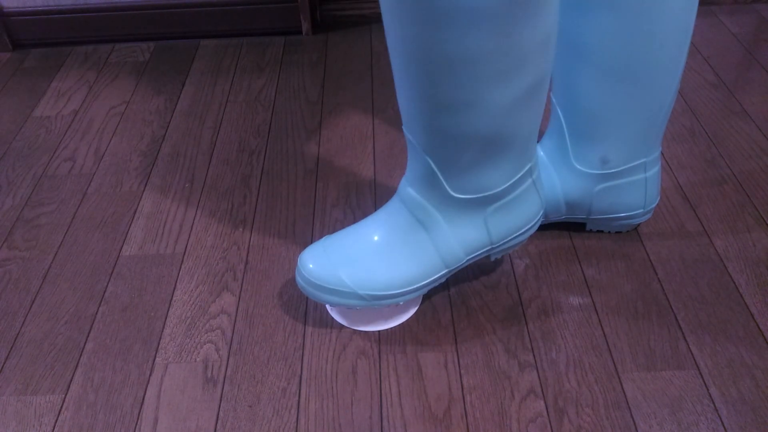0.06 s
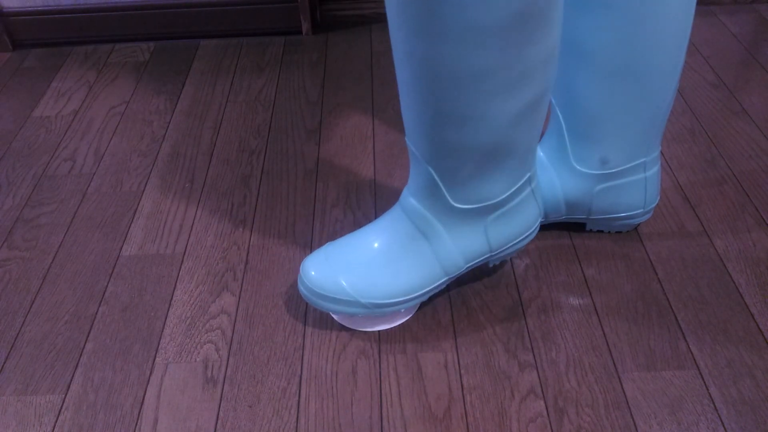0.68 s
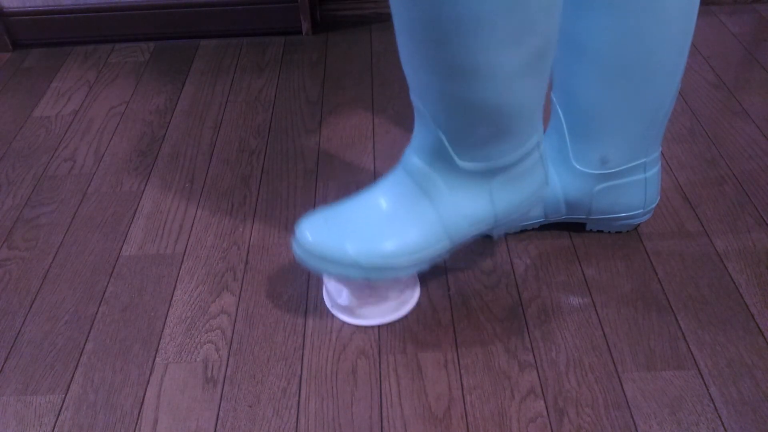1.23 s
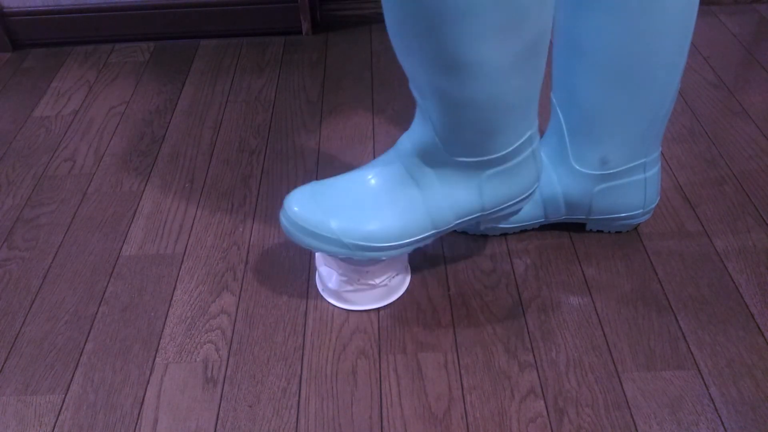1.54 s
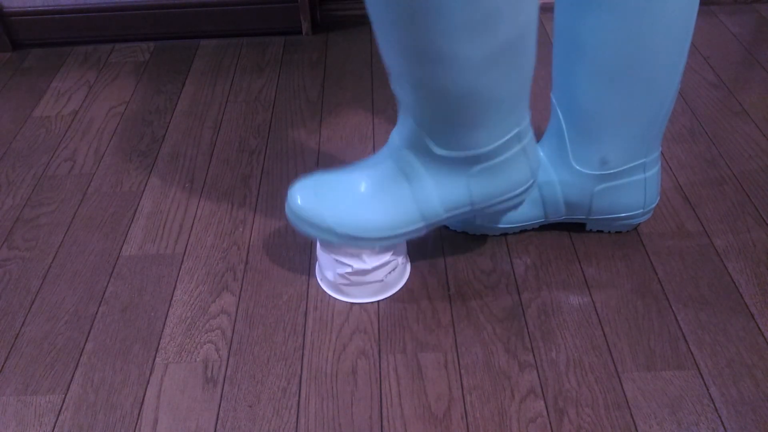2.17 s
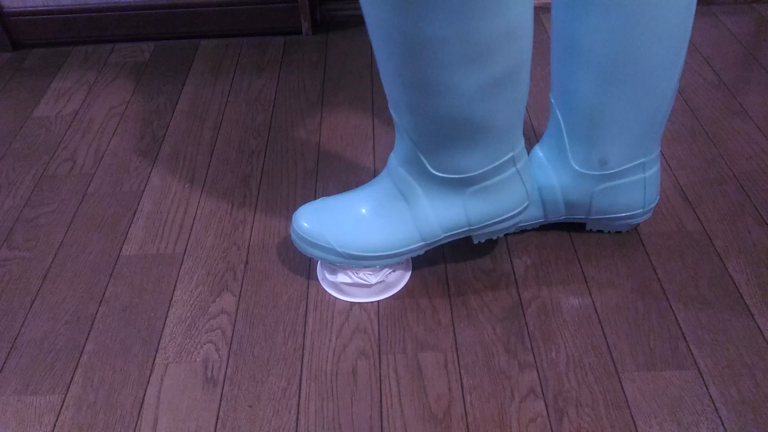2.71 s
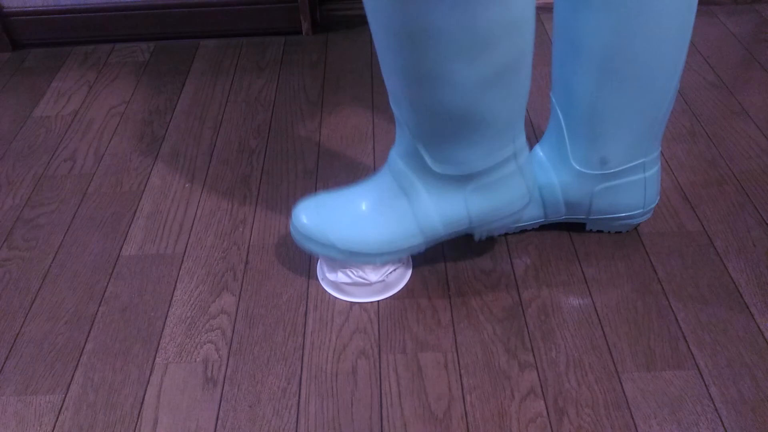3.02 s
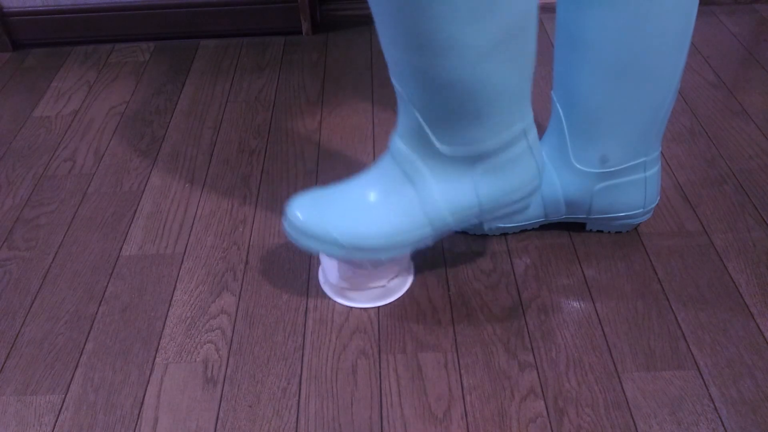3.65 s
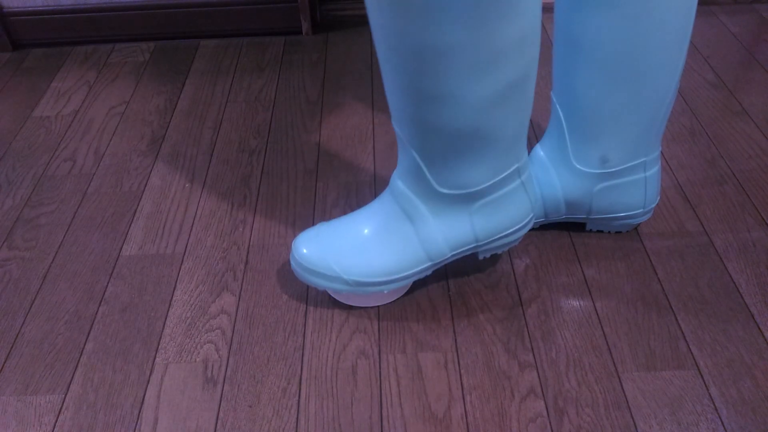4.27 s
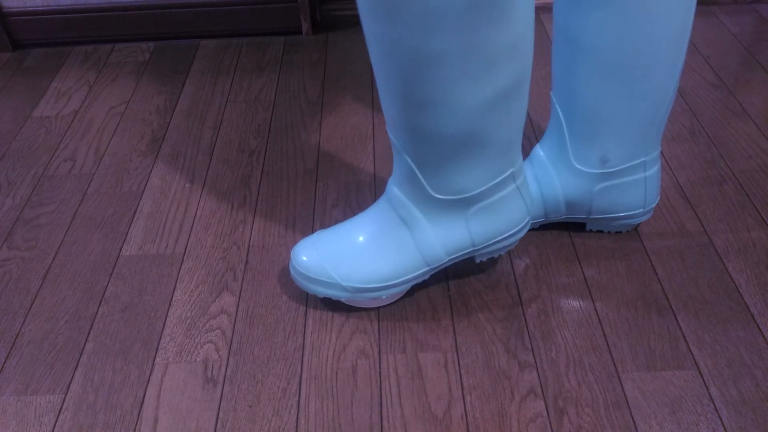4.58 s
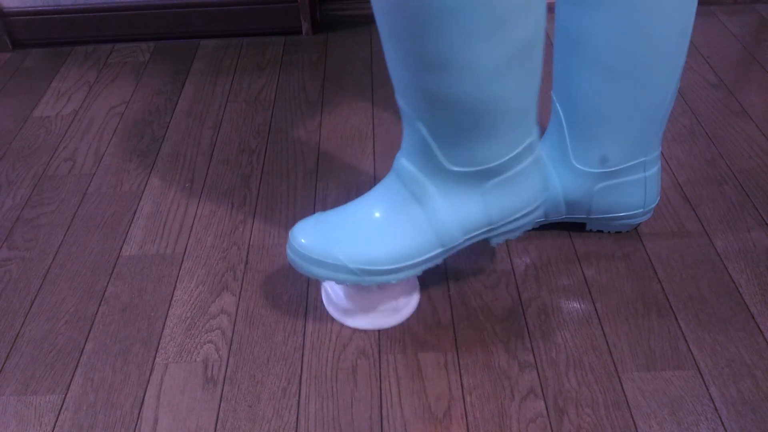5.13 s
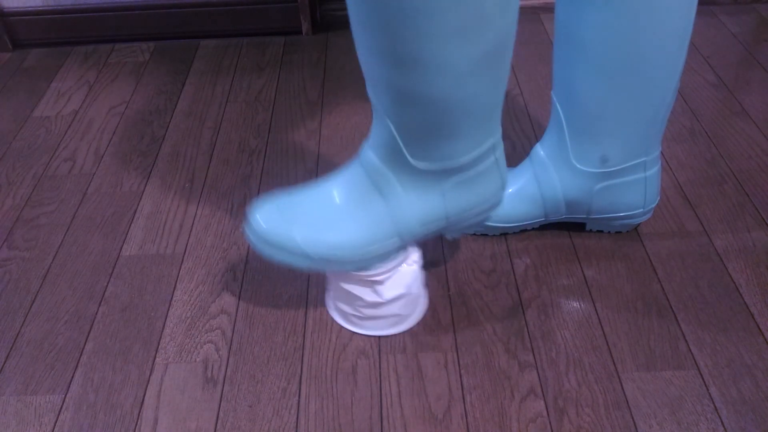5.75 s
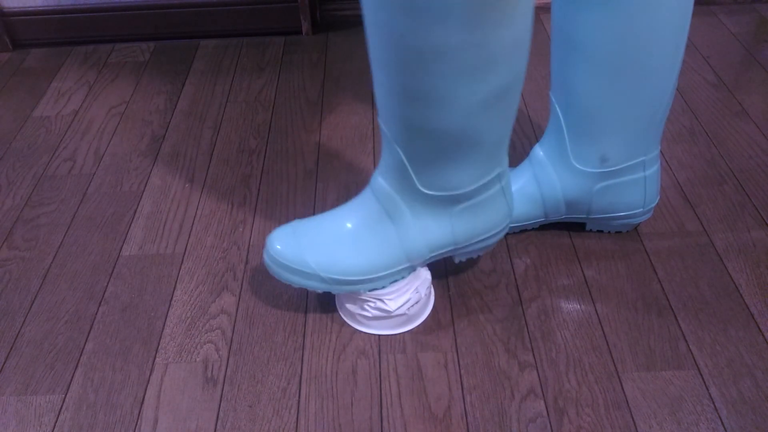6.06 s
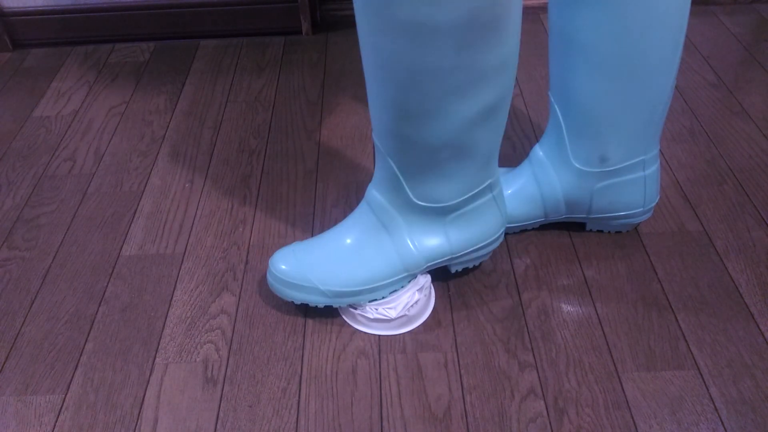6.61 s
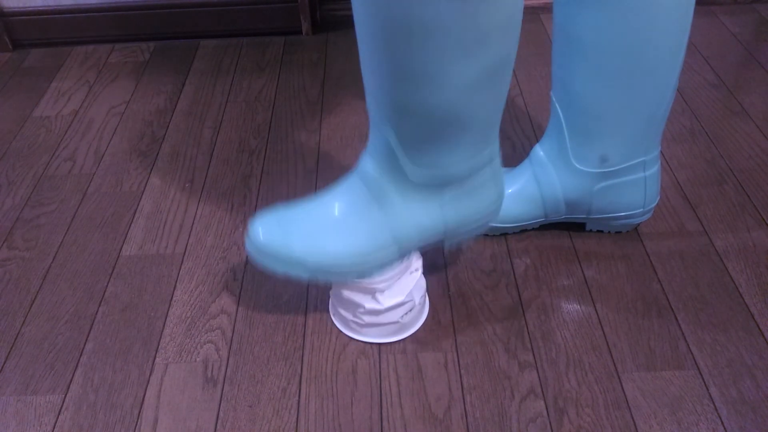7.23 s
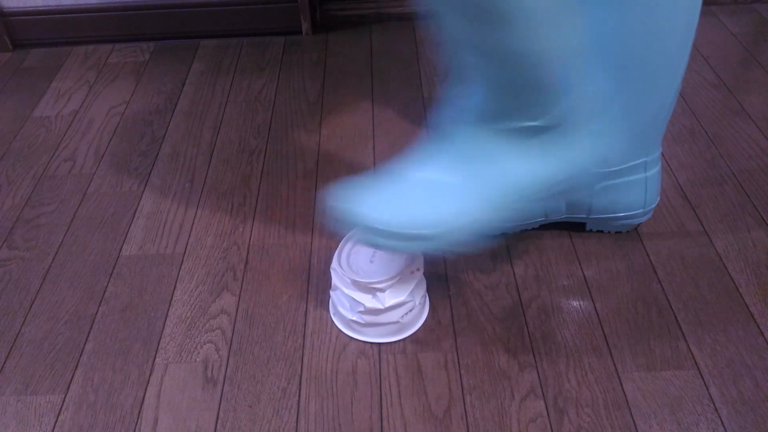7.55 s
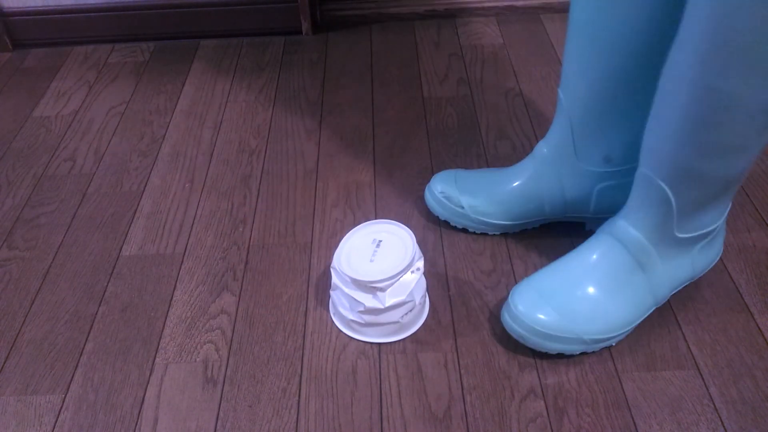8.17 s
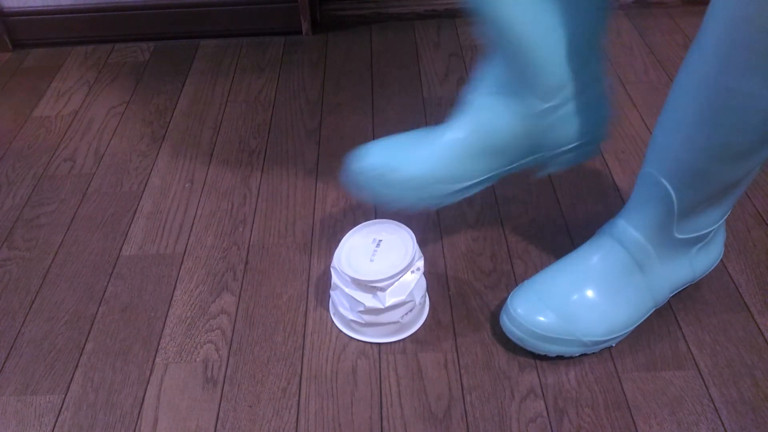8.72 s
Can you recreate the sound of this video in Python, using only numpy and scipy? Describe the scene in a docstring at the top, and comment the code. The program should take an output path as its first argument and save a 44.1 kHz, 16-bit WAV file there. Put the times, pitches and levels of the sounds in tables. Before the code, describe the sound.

A rubber boot presses an upturned plastic cup against a wooden floor and lets it spring back, three times. The thin wall crackles and pops in short clusters with pauses between, the rim knocks on the boards, and the sole rubs faintly. Near the end the boot steps softly away and a tiny lens motor whirs. It sounds close, in a small, hard room with low hum and hiss.

```python
"""A plastic cup, upside down on a wooden floor, is pressed by a rubber boot and springs back, three times.
Creases snap in its thin wall, whole panels pop in and out, and the rim knocks on the boards.
The sole rubs as it pushes, then the boot steps away. A small hard room echoes these sounds.
Mains hum and hiss lie underneath, and a camera's lens motor whirs at the end."""
import sys
import numpy as np
from scipy import signal
from scipy.fft import rfft, irfft
from scipy.io import wavfile
from scipy.ndimage import uniform_filter1d

SR = 44100
rng = np.random.default_rng(int(sys.argv[2]) if len(sys.argv) > 2 else 0)


def transcribe(u):
    """Save the signal u as a 16-bit wav file named by the first command-line argument.

    u: samples, shape (n,) or (channels, n), limited to [-1, 1]; the rate is SR.
    q: integer samples, one column per channel.
    """
    v = np.clip(np.atleast_2d(u).T, -1, 1)
    q = np.round(v * 32767).astype(np.int16)
    wavfile.write(sys.argv[1], SR, q)


N = 392049

# Levels in a table compare its rows with each other; the functions may turn them up or down.
# tone of the steady hiss: frequency_hz, level_db
HISS_TONE = [(30, -40), (55, 12), (75, 8.5), (105, 6.5), (170, -1.5), (260, -5), (450, -6.5), (900, -8),
             (2000, -13), (4000, -16.5), (6500, -20.5), (8000, -24), (9000, -29.5), (14000, -29.5)]
# tones of the mains hum: pitch_hz, level_db
HUM_TONES = [(58.2, -63), (119, -76.5)]
# rim or boot knocking on the boards: start_s, level_db, pitch_hz
KNOCKS = [(.399, -24.5, 350), (1.875, -8, 131), (1.895, -15.5, 237), (1.983, -13, 225), (3.304, -11, 254),
          (3.741, -18, 307), (5.199, -2.5, 361.7), (5.202, -4.5, 213.5), (5.832, -14, 335),
          (7.277, -20, 241), (8.061, -31.5, 314), (8.52, -27, 117)]
# how the boards answer a knock: frequency_hz, gain_db
BOARD_TONE = [(30, -24), (70, -16), (130, -4), (198, -7.5), (280, -8.5), (370, -3.5), (480, 5.5),
              (800, -16), (2000, -6)]
# panels popping in or out: start_s, level_db, pitch_hz, fade_cycles
POPS = [(.3995, -20.5, 870, 0.26), (1.079, -13, 1020, 0.26), (1.0892, -3.5, 462, 0.26),
        (1.553, -10, 547, 0.7), (1.74, -17.5, 590, 0.39), (1.8972, 4, 588, 0.87), (1.9815, -0.5, 480, 0.89),
        (2.0155, -2, 566, 0.41), (2.5483, -9, 1230, 0.49), (2.566, -9.5, 1500, 0.6), (2.8, -36, 577, 0.26),
        (3.191, 4.5, 593, 0.32), (3.3035, -1, 526, 0.21), (5.098, -16.5, 494, 0.17),
        (5.1995, -2.5, 760, 0.54), (5.895, -14.5, 383, 0.19), (7.1425, -9, 590, 0.22),
        (7.277, -7, 670, 0.25), (7.663, -32, 480, .7)]
# the wall giving way or settling in small dents: start_s, length_s, first_level_db, pitch_hz, dents_per_s
DENT_RUNS = [(1.373, 0.082, -14.5, 560, 50.6), (2.368, .05, -25, 656, 36), (3.48, 0.14, -25.5, 463, 21.7),
             (3.716, .14, -24.5, 450, 30.3), (5.327, .08, -19, 462, 20.5), (6.051, .13, -27.5, 630, 10),
             (7.366, 0.044, -20.5, 527, 32), (7.511, .05, -24.5, 500, 33)]
# how well the cup passes its pops to the air: frequency_hz, gain_db
CUP_TONE = [(80, -10), (230, -18), (380, -2), (1700, -5.5), (2400, -9), (3200, -24.5), (8000, -27)]
# first echoes from boot, floor and furniture: delay_s, gain
ECHOES = [(.0016, 0.057), (.0058, 0.038), (0.0105, 0.09), (0.0166, 0.067), (.0182, 0.078)]
# time the room's late echo takes to fall by 60 dB: frequency_hz, fade_s
ROOM_FADE = [(140, 0.38), (200, 0.24), (300, 0.32), (550, 0.39), (1400, 0.45), (4000, 0.47), (7500, 0.38),
             (12000, 0.4)]
# strength of the room's echo: frequency_hz, gain_db
ROOM_TONE = [(120, -8), (200, 0.5), (280, -3), (420, -5.5), (900, 2), (4000, -2.5), (9500, -3.5),
             (14000, -6)]
# creases snapping: start_s, crack_db, brightness_db_per_octave, ring_db, direct_over_room_db
SNAPS = [(.4692, -22.5, 1.5, -34, -6), (.5611, -28.5, -6, -49, -10), (.9023, -19, 0, -32, -5),
         (.909, -16.5, 12, -35, -5.5), (.9893, -10.5, -2.5, -10, -5.5), (1.0029, -10.5, 7.5, -10.5, -5.5),
         (1.0081, -26, 13, -6.5, -4.5), (1.0893, -1, 0.8, -7.5, -7.5), (1.2707, -20.5, 1, -45, -5.5),
         (1.5546, -30, 0.5, -26, -5), (1.8784, -15.5, -11.5, -35, -8), (1.8962, -13, 1.5, -18, -6),
         (1.9813, -9.5, 0, -7.5, -9.5), (2.2874, -31.5, -5.5, -32, -6), (3.1025, -26, 9, -51, -7),
         (3.11, -4, -2, -14.5, -9), (3.1911, 4, -2, 0.5, -5), (3.3042, -14.5, -2, -13, -12),
         (3.8417, -33, -3, -35, -6), (4.8606, -8, 5.5, -20.5, -7.5), (4.871, -9.5, 13.5, -19, -13),
         (4.926, -6.5, 8, -27, -6.5), (4.9433, 3, -0.5, -15, -7), (4.995, -8, 2, -11, -6),
         (5.1684, -17.5, -2.5, -31, -7), (5.2043, -11, -2, -7.5, -7), (6.0532, -33, -6, -47, -4.5),
         (7.001, -24.5, -11.5, -35, -8), (7.03, -16.5, -2, -32, -6.5), (7.1153, -16.5, 4.5, -38, -12),
         (7.1429, -5, -4, -19, -8), (7.1468, 2, 3, -11.5, -2.5), (7.2784, -6.5, 2.5, -14, -4)]
# tone of one crack: frequency_hz, level_db
CRACK_TONE = [(100, -29), (230, -25), (380, -1), (1000, -0.5), (2200, 2), (4500, 3.5), (6600, 3), (8100, 5),
              (8800, -10.5), (10500, -12), (14000, -26)]
# the sole rubbing over cup and floor: peak_s, swell_s, fade_s, level_db
RUBS = [(1.43, 0.23, 0.091, -49), (1.557, .01, 0.054, -50), (2.17, 0.14, 0.22, -53.5),
        (2.37, 0.054, 0.39, -55), (2.8, 0.05, 0.061, -63), (3.75, 0.089, .3, -58), (3.991, 0.11, 0.12, -50),
        (5.85, .025, 0.21, -50.5), (6.056, 0.0095, 0.19, -56.5), (6.36, 0.096, 0.23, -64.5),
        (7.405, 0.031, 0.084, -47), (8.03, 0.065, 0.11, -58.5), (8.501, 0.047, .08, -52)]
# tone of the rubbing: frequency_hz, level_db
RUB_TONE = [(100, -21), (300, 10.5), (600, 12), (1300, 7.5), (2500, 1), (7500, -0.5), (9000, -16),
            (14000, -28.5)]
# runs of the lens motor: start_s, length_s, level_db
MOTOR_RUNS = [(7.53, 0.33, -71), (8.557, .4, -74.5)]
# pitches at which the motor's housing rings: pitch_hz, width_hz, level_db
HOUSING_RINGS = [(4400, 4200, 1.5), (5050, 260, -14), (6050, 150, 6), (6500, 130, -2), (7650, 480, -3)]
# how much echo and hiss differ between left and right: frequency_hz, gain_db
STEREO_WIDTH = [(1500, -75.5), (3000, -66), (4500, -37.5), (6500, -8), (8000, -9.5), (12000, -6)]


def gain_of(db):
    """Turns decibels into a number to multiply by."""
    return 10 ** (np.asarray(db) / 20)


def unit_energy(x):
    """Scales a sound so that its squares add up to 1."""
    return x / np.sqrt(np.sum(x ** 2) + 1e-20)


def unit_rms(x):
    """Scales a sound so that its squares average 1."""
    return unit_energy(x) * np.sqrt(len(x))


def curve_at(points, hz):
    """Joins a table's points by straight lines on a scale of octaves."""
    known_hz, value = np.transpose(points)
    return np.interp(np.log(hz + 1), np.log(known_hz + 1), value)


def add(mix, start_s, sound):
    """Mixes a sound in at the given time."""
    part = mix[round(start_s * SR):][:len(sound)]
    part += sound[:len(part)]


def clock(size):
    """The time of each sample in seconds."""
    return np.arange(size) / SR


def colour(x, tone):
    """Turns each frequency of a sound up or down as a table says."""
    hz = np.fft.rfftfreq(len(x), 1 / SR)
    return irfft(rfft(x) * gain_of(curve_at(tone, hz)), len(x))


def body_response(db):
    """The spectrum of an object with these gains: it rings after a blow, never before."""
    return np.exp(np.conj(signal.hilbert(np.log(gain_of(db)))))


def swing(hz, fade_cycles, rise, size=4096):
    """A vibration that swells and dies away; a larger rise makes it swell later."""
    turns = hz * clock(size)
    return unit_energy(turns ** rise * np.exp(-turns / fade_cycles) * np.sin(2 * np.pi * turns))


def hiss(level_db=-65):
    """Steady air noise of the room and the microphone."""
    return gain_of(level_db) * unit_rms(colour(rng.standard_normal(N), HISS_TONE))


def mains_hum(waver=0.04):
    """Mains power hums in two low tones whose level wavers slightly."""
    slow_drift = unit_rms(colour(rng.standard_normal(N), [(4, -3.5), (14, -18.5), (40, -100)]))
    tones = sum(gain_of(db) * np.sqrt(2) * np.sin(2 * np.pi * (hz * clock(N) + rng.random()))
                for hz, db in HUM_TONES)
    return tones * (1 + waver * slow_drift)


def floor_knocks(thud_cycles=0.68, ring_hz=204, ring_cycles=5, ring_db=-11):
    """The boards answer a blow with a short low thud, and the plank hums on briefly."""
    blows = np.zeros(N)
    ring = gain_of(ring_db) * swing(ring_hz, ring_cycles, rise=0.13)
    for start_s, db, hz in KNOCKS:
        thud = swing(hz, thud_cycles, rise=0.58)
        add(blows, start_s, gain_of(db) * (thud + ring))
    board_db = curve_at(BOARD_TONE, abs(np.fft.fftfreq(8192, 1 / SR)))
    boards = np.fft.ifft(body_response(board_db)).real
    return signal.oaconvolve(blows, boards)[:N]


def panel_pops(overtone_ratio=1.76, overtone_db=-7, overtone_cycles=0.67):
    """A panel flips and swings briefly against the air in the cup, damped by the sole."""
    beams = np.zeros((3, N))  # three directions into the room, used in turn
    for k, (start_s, db, hz, fade_cycles) in enumerate(POPS + small_dents()):
        overtone = gain_of(overtone_db) * swing(hz * overtone_ratio, overtone_cycles, rise=0.79)
        flip = swing(hz, fade_cycles, rise=2.35) + overtone
        add(beams[k % 3], start_s, gain_of(db) * unit_energy(flip))
    return np.array([colour(beam, CUP_TONE) for beam in beams])


def small_dents(most=8, fade_db_per_s=28, jitter=0.081, spread_db=0.6, spread_octaves=0.13, cycles=0.72):
    """The wall dents in fading, slightly uneven runs of small pops; gives rows like those of POPS."""
    rows = []
    for start_s, length_s, first_db, hz, dents_per_s in DENT_RUNS:
        later, louder, higher = rng.standard_normal((3, most))
        gaps = np.exp(jitter * later) / dents_per_s
        waits = np.cumsum(gaps) - gaps
        levels = first_db - fade_db_per_s * waits + spread_db * louder
        pitches = hz * 2 ** (spread_octaves * higher)
        rows += [(start_s + wait, level, pitch, cycles)
                 for wait, level, pitch in zip(waits, levels, pitches) if wait < length_s]
    return rows


def room_echo(x, early_fade_s=0.086, early_db=3, build_s=0.0043, lumpiness=0.47, size=32768):
    """The room returns a few strong echoes and many dense ones that drop quickly, then linger."""
    bounces = rng.standard_normal(size) * np.exp(lumpiness * rng.standard_normal(size))
    hz, frame_s, bands = signal.stft(bounces, SR, nperseg=256)
    late = gain_of(-60 * frame_s / curve_at(ROOM_FADE, hz)[:, None])
    early = gain_of(early_db - 60 * frame_s / early_fade_s)
    tail = signal.istft(bands * np.hypot(late, early), SR, nperseg=256)[1][:size]
    tail = unit_energy(tail * (1 - np.exp(-clock(size) / build_s)))
    for delay_s, gain in ECHOES:
        tail[round(delay_s * SR)] += gain
    # even out the broad tone, then give it that of the walls; narrow peaks and dips stay random
    spectrum = rfft(tail)
    broad_tone = np.sqrt(uniform_filter1d(abs(spectrum) ** 2, size=120))
    tail = colour(unit_energy(irfft(spectrum / broad_tone)), ROOM_TONE)
    return signal.fftconvolve(x, tail[:size * 3 // 4])[:N]


def crack(brightness, spread_s=0.00035, evenness=0.5, size=1024):
    """A crease gives way in a flurry of tiny slips, over in about a millisecond."""
    t, hz = clock(size), abs(np.fft.fftfreq(size, 1 / SR))
    slips = np.fft.fft(rng.standard_normal(size) * t * np.exp(-t / spread_s))
    treble_db = brightness * np.log2(np.clip(hz, 2000, 7000) / 2000)
    wall = body_response(curve_at(CRACK_TONE, hz) + treble_db)
    return unit_energy(np.fft.ifft(wall * slips / abs(slips) ** evenness).real)


def crease_snaps(patch_hz=1400, ring_cycles=0.57, tick_db=-16, tick_wait_s=0.022, ticks=3):
    """Each crack rings a patch of wall, which sends it into the room and straight to the listener."""
    beams, direct = np.zeros((3, N)), np.zeros(N)
    for k, (start_s, crack_db, brightness, ring_db, direct_db) in enumerate(SNAPS):
        # the brighter cracks come from small patches, which ring higher
        octaves_up = 0.14 * max(brightness - 1.5, 0)
        ring = swing(patch_hz * 2 ** octaves_up, ring_cycles, rise=1.0, size=1024)
        snap = gain_of(crack_db) * crack(brightness) + gain_of(ring_db) * ring
        add(beams[k % 3], start_s, snap)
        add(direct, start_s, gain_of(direct_db) * snap)
        # the crease runs on in a few smaller ticks, weaker the later they come
        for wait in rng.exponential(tick_wait_s, ticks):
            strength = gain_of(crack_db + tick_db) * np.exp(-wait / tick_wait_s / 2)
            add(direct, start_s + wait, strength * crack(brightness))
    return beams, direct


def sole_push(peak_s, swell_s, fade_s, db, change_db=19):
    """A push of the sole grows by change_db over swell_s and loses as much over fade_s."""
    t = clock(N) - peak_s
    from_peak = np.maximum(-t / swell_s, t / fade_s)
    return gain_of(db - change_db * np.minimum(from_peak, 10))


def sole_rubbing(slips_per_s=600, spread_db=4, gain_db=-4):
    """Rubber sticks and slips, making many tiny clicks of uneven size."""
    clicks = rng.choice([-1, 1], N) * (rng.random(N) < slips_per_s / SR)
    sizes = gain_of(spread_db * np.minimum(rng.exponential(1, N), 4))
    scrape = unit_rms(colour(clicks * sizes, RUB_TONE))
    push = sum(sole_push(*rub) for rub in RUBS)
    return gain_of(gain_db) * scrape * uniform_filter1d(push, size=600)


def motor_level(start_s, length_s, db, rise_s=0.091, sag_db_per_s=6, fade_s=0.6):
    """The motor's level as it spins up, eases off while running, and runs down."""
    t = np.maximum(clock(N) - start_s, 0)
    spin_up = np.minimum(t / rise_s, 1)
    run_down = np.exp(-np.maximum(t - length_s, 0) / fade_s)
    return gain_of(db - sag_db_per_s * t) * spin_up * run_down


def lens_motor():
    """A tiny motor whirs at the few pitches where its housing rings."""
    hz = np.fft.rfftfreq(N, 1 / SR)
    housing = sum(gain_of(db) / (1 + (2 * (hz - pitch) / width) ** 2)
                  for pitch, width, db in HOUSING_RINGS)
    whir = unit_rms(irfft(rfft(rng.standard_normal(N)) * housing, N))
    return whir * sum(motor_level(*run) for run in MOTOR_RUNS)


def scene(pop_direct_db=-2, knock_direct_db=-1.0, knock_room_db=-0.5, rub_direct_db=-5, hiss_side_db=3):
    """Everything sits in the middle; only the treble of echoes and hiss differs between left and right."""
    snap_beams, snap_direct = crease_snaps()
    pop_beams, knocks, rubs = panel_pops(), floor_knocks(), sole_rubbing()
    direct = snap_direct + gain_of(pop_direct_db) * pop_beams.sum(0)
    direct += gain_of(knock_direct_db) * knocks + gain_of(rub_direct_db) * rubs
    # sound thrown in different directions meets different echoes
    echoes = sum(room_echo(beam) for beam in snap_beams + pop_beams)
    echoes += room_echo(gain_of(knock_room_db) * knocks + rubs)
    middle = direct + echoes + hiss() + mains_hum() + lens_motor()
    side = colour(room_echo(snap_beams.sum(0) + rubs) + gain_of(hiss_side_db) * hiss(), STEREO_WIDTH)
    return np.array([middle + side, middle - side])


def record(dry):
    """Cuts away the highest treble."""
    cutoff_hz = 14500
    low_pass = signal.firwin(511, cutoff_hz, window=("kaiser", 9), fs=SR)
    return signal.oaconvolve(dry, low_pass[None], "same")


dry = scene()
out = record(dry)
transcribe(out)
```